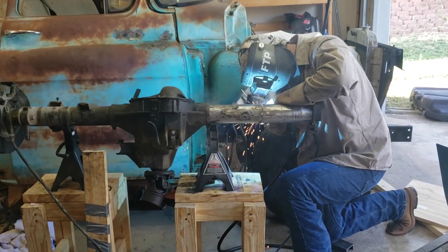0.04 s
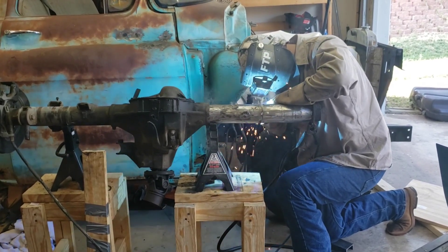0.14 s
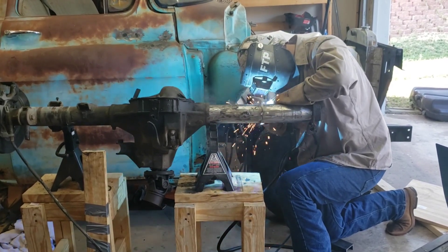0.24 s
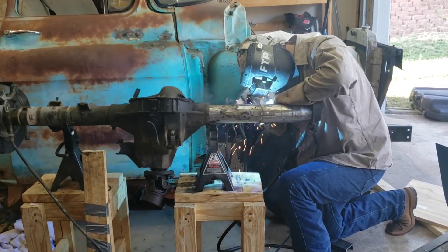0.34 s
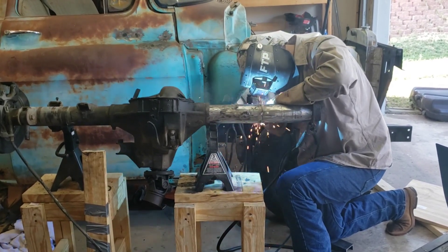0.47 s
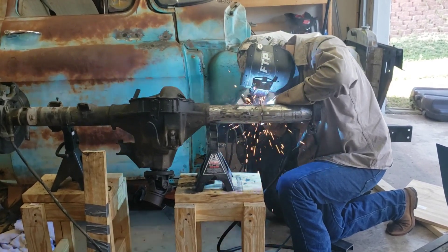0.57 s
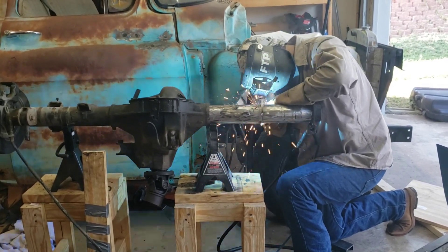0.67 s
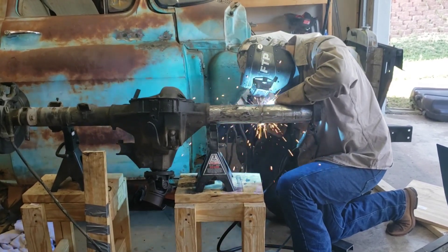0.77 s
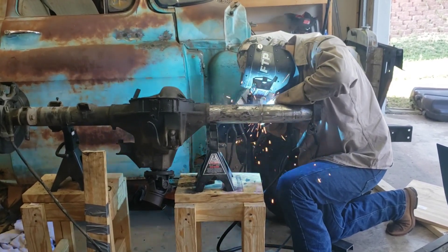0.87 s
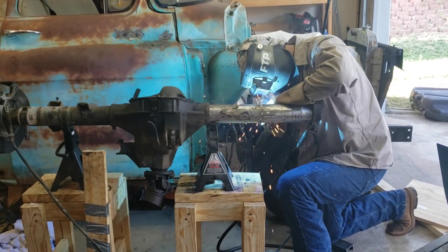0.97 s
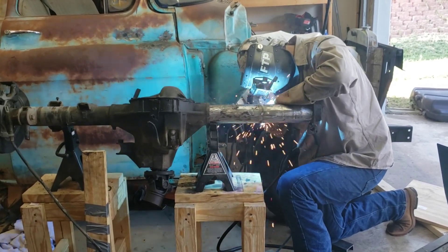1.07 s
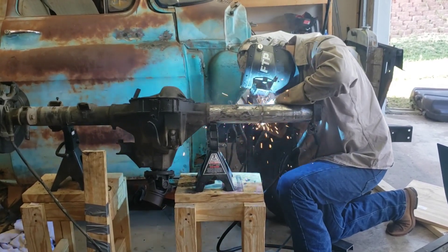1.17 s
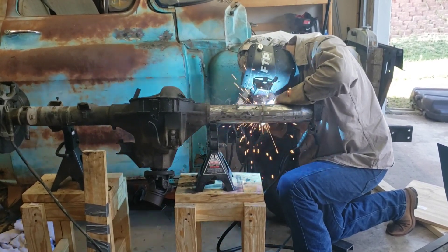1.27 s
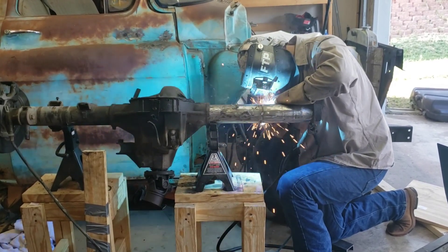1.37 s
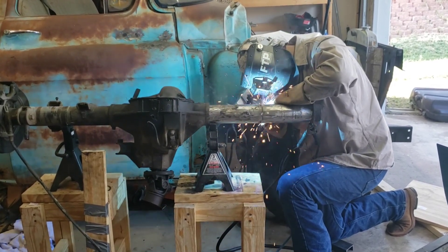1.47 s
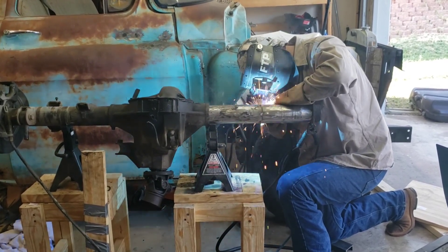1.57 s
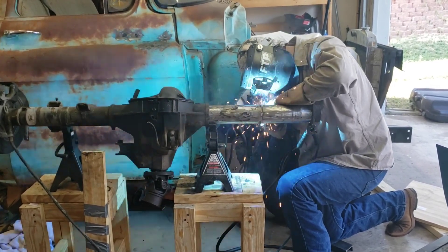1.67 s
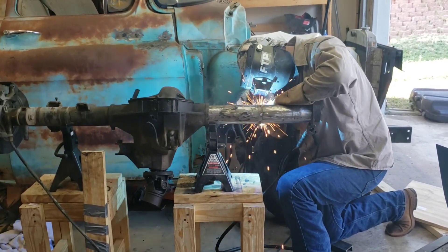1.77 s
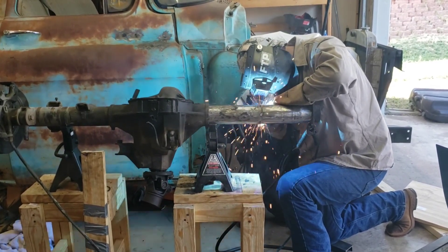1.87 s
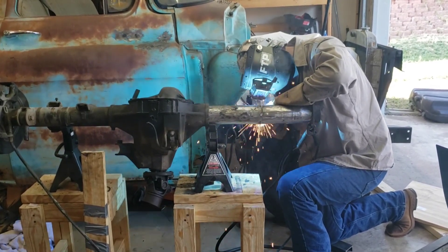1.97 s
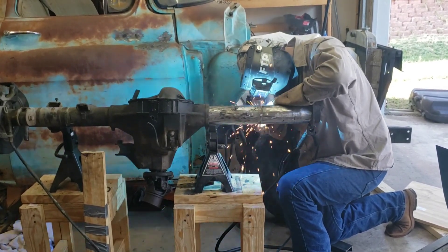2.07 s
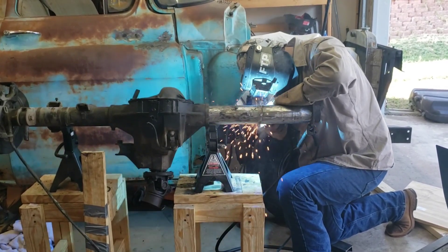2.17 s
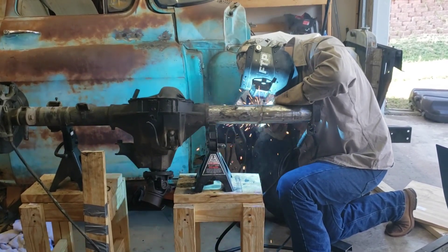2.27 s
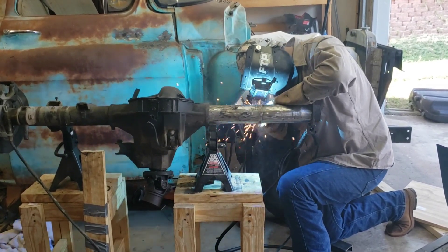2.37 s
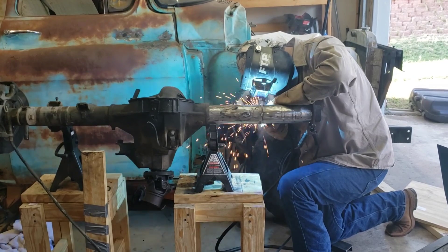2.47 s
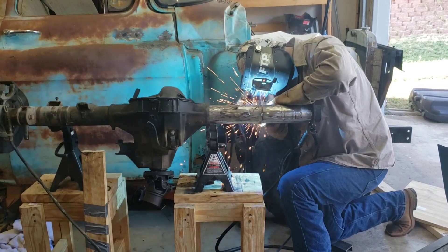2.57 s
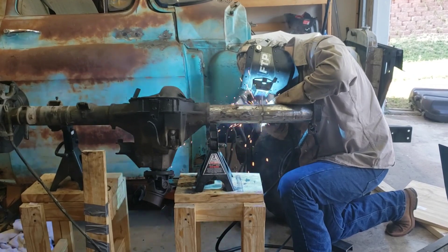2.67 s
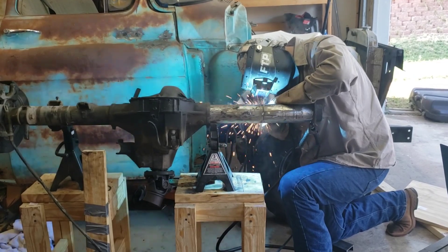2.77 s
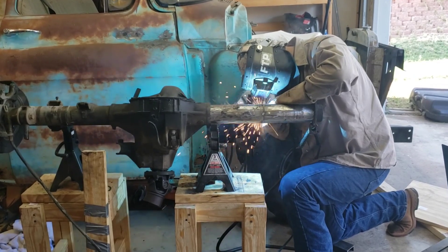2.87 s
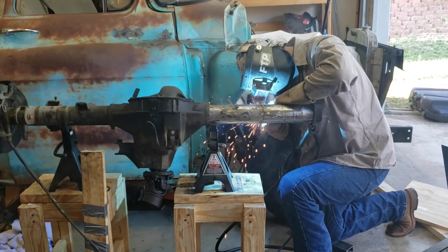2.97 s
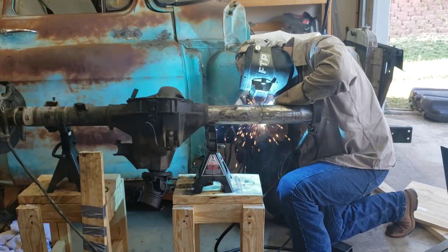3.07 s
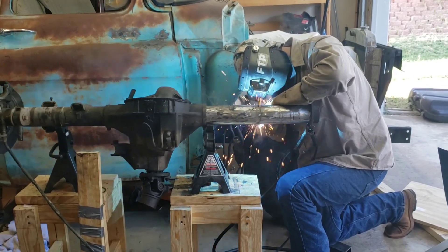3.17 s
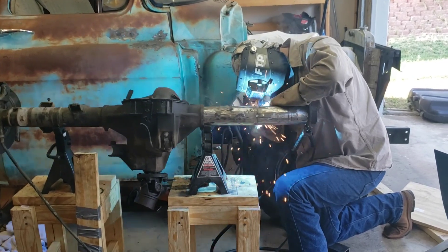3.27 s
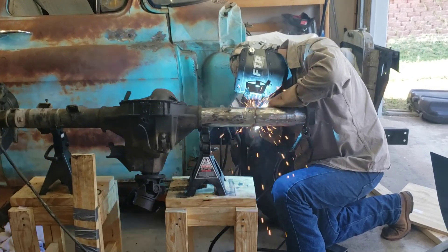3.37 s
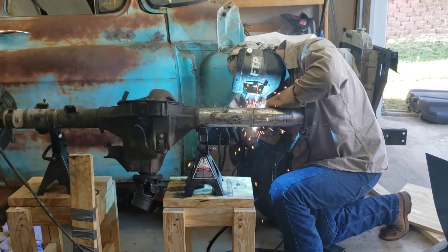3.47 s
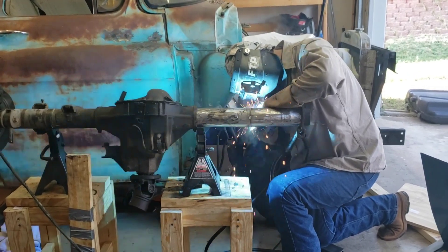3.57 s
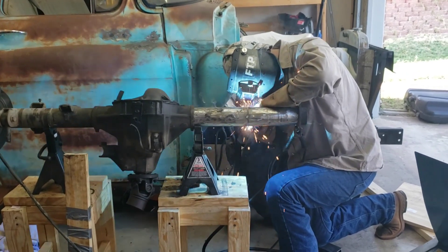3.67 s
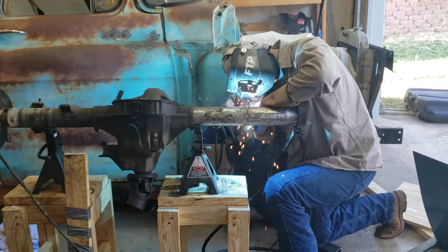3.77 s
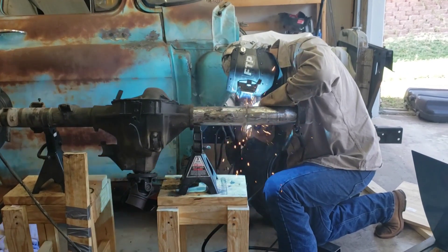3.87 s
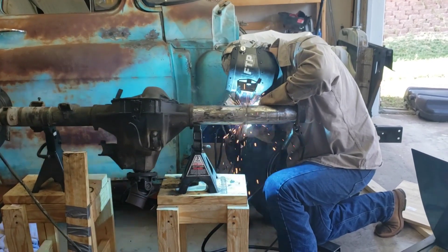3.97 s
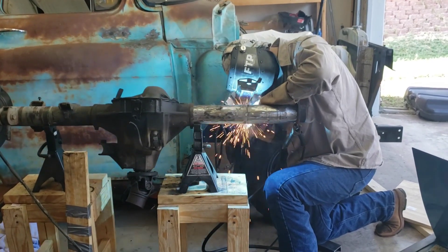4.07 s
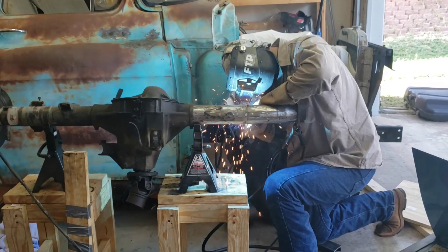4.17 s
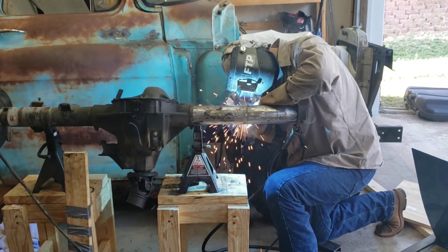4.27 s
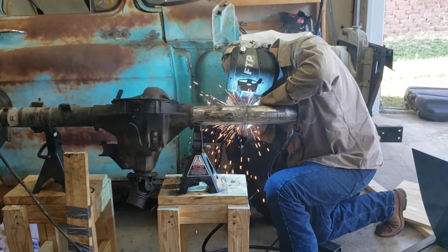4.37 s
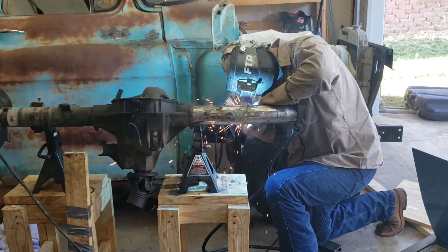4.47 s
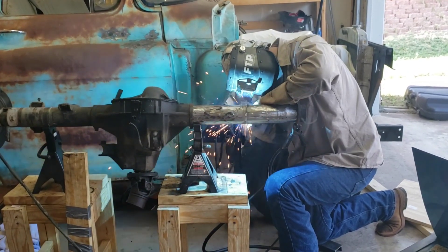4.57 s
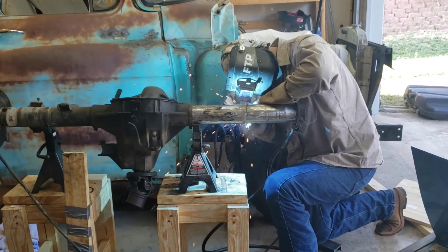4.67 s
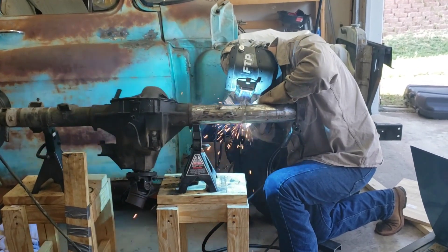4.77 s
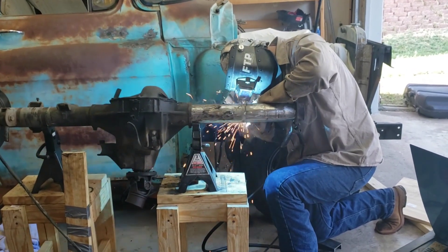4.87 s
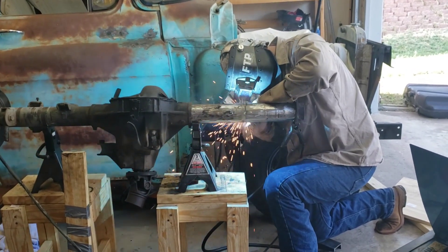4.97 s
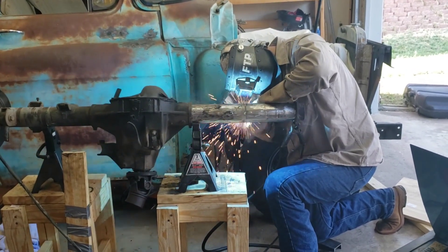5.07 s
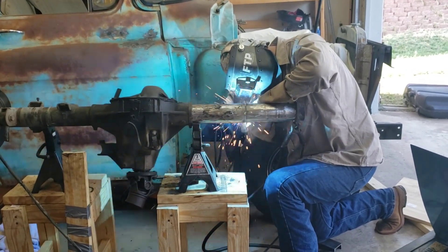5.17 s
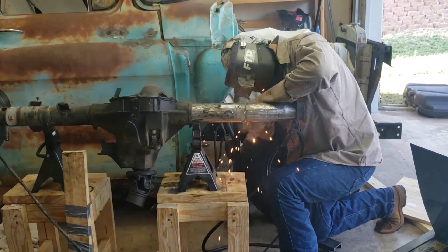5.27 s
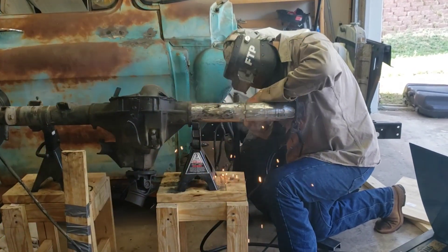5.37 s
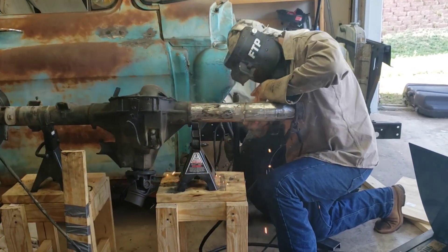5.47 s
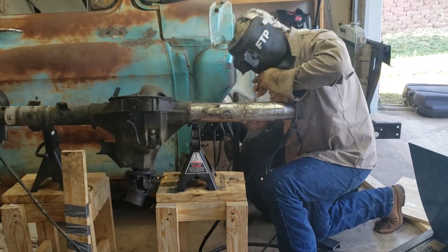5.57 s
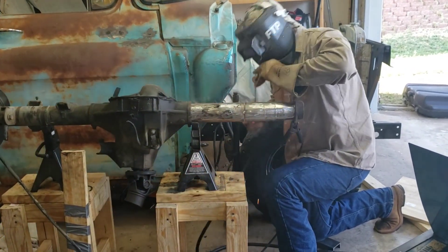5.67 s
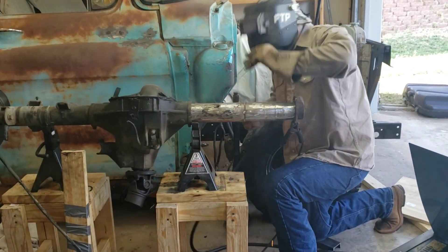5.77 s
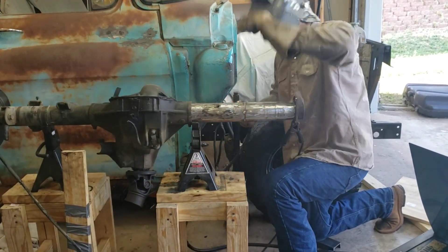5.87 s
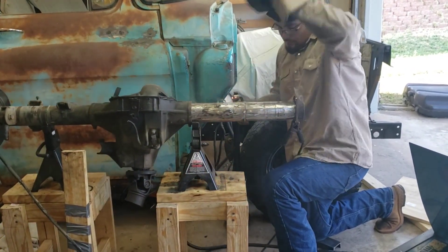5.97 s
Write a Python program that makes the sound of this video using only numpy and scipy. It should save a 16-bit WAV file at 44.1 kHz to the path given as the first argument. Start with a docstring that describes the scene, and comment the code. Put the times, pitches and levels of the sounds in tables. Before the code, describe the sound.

Close by in a small workshop, an electric welding arc is already crackling on steel, a fast, buzzing, frying sound with a slight metallic ring. It falters and pops now and then, growing slightly stronger and busier in the second half. The sizzle cuts off abruptly after roughly five seconds, uncovering the quiet whir of the welder's cooling fan and a faint brush of heavy cloth.

```python
"""A workshop: short-circuit wire welding on a steel axle tube, heard by a phone two metres away.
About ninety times a second the wire spits into the pool, then pinches off with a crack;
tube and room ring and smear the cracks into a sizzle. The arc stops at once, leaving
the machine's fan and hum and a rustle of the jacket as the helmet is lifted."""
import sys
import numpy as np
from scipy import signal
from scipy.fft import rfft, irfft, next_fast_len
from scipy.io import wavfile
from scipy.ndimage import uniform_filter1d

SR = 44100
rng = np.random.default_rng(int(sys.argv[2]) if len(sys.argv) > 2 else 0)


def int16_out(signal):
    """Quantize to a 16-bit WAV file."""
    q = np.round(np.clip(np.atleast_2d(signal).T, -1, 1) * 32767)
    wavfile.write(sys.argv[1], SR, q.astype(np.int16))


N = 265769
TIME = np.arange(N) / SR
ARC_STOP_S = 5.241


def undb(db):
    """Decibels to gain."""
    return 10 ** (np.asarray(db) / 20)


def unit(x):
    """Scale to rms 1."""
    return x / np.sqrt(np.mean(x ** 2))


def curve(table):
    """Linear envelope through (time_s, value) rows."""
    return np.interp(TIME, *np.array(table, float).T)


def walk(rate_hz):
    """Smooth random drift, rms 1."""
    return unit(np.interp(TIME * rate_hz, np.arange(N), rng.standard_normal(N)))


def clicks(times_s, sizes):
    """One impulse at each time."""
    return np.bincount(np.clip(times_s * SR, 0, N - 1).astype(int), sizes, N)


def colour(x, outline, peaks=()):
    """Minimum-phase filter: (freq_hz, gain_db) outline plus (freq_hz, width_hz, gain_db) peaks."""
    size = 2 * next_fast_len(x.shape[-1] // 2 + 4096)
    hz = np.maximum(np.fft.rfftfreq(size, 1 / SR), 1)
    outline_hz, outline_db = np.array(outline, float).T
    db = np.interp(np.log(hz), np.log(outline_hz), outline_db)
    for centre_hz, width_hz, gain_db in peaks:
        db = db + gain_db / (1 + (2 * (hz - centre_hz) / width_hz) ** 2)
    cepstrum = irfft(np.log(undb(db)))
    cepstrum[1:size // 2] *= 2
    cepstrum[size // 2 + 1:] = 0
    return irfft(rfft(x, size) * np.exp(rfft(cepstrum)))[..., :x.shape[-1]]


def flatten(response, width_hz=50):
    """Level a response's broad humps and hollows, keeping its fine pattern."""
    spectrum = rfft(response, SR)
    power = uniform_filter1d(abs(spectrum) ** 2, size=width_hz)
    return irfft(spectrum / np.sqrt(power), SR)[:, :response.shape[1]]


def diffuse(size, apart_hz):
    """Noise from all sides: bass alike at both microphone ports, treble unrelated."""
    mid, side = rfft(rng.standard_normal((2, size)))
    coherence = 1 / (1 + (np.fft.rfftfreq(size, 1 / SR) / apart_hz) ** 2)
    mid, side = mid * np.sqrt(1 + coherence), side * np.sqrt(1 - coherence)
    return irfft(np.array([mid + side, mid - side]), size) / np.sqrt(2)


# Cooling air spectrum: freq_hz, gain_db
FAN_SPECTRUM = [(30, -35), (60, -24), (90, -13.5), (160, -14.5), (215, -7.5), (450, -12), (600, -10),
                (1050, -11), (1700, -22), (3300, -31.5), (4300, -31), (5500, -35.5), (7500, -48),
                (12000, -46), (15500, -42)]
# Motor and blade tones: pitch_hz, level_db
FAN_HUM = [(52, -65), (210, -62), (238, -64), (323, -66), (468, -69), (576, -61), (705, -66), (894, -68)]


def fan(air_db=-48.5, waver_hz=2.27):
    """Air rushes through the machine's case over the wavering tones of motor and blades."""
    air = unit(colour(diffuse(N, apart_hz=884), FAN_SPECTRUM))
    air *= undb(air_db + .7 * walk(rate_hz=9))
    hum = 0
    for pitch_hz, level_db in FAN_HUM:
        phase = 2 * np.pi * np.cumsum(pitch_hz + waver_hz * walk(rate_hz=14)) / SR
        hum += np.sqrt(2) * undb(level_db + 2 * walk(rate_hz=6.5)) * np.sin(phase)
    return air + hum


# Jacket slide: time_s, level_db
JACKET_LEVEL = [(5.7, -90), (5.82, -72), (5.89, -71), (5.93, -66), (6.03, -71)]
# Rubbing cotton spectrum: freq_hz, gain_db
COTTON_SPECTRUM = [(100, -18), (600, 2), (2000, -8.5), (5000, -10), (9000, -13), (15000, -8)]


def jacket(grain_db=3):
    """Heavy cotton rubs in small catches as the arm comes up."""
    rub = unit(colour(diffuse(N, apart_hz=1000), COTTON_SPECTRUM))
    return rub * undb(curve(JACKET_LEVEL) + grain_db * walk(rate_hz=47))


def room_echoes(t, t60_low_s=.285, t60_high_s=.24, build_s=.004, cluster_db=5.5, cluster_s=.012):
    """A quick echo cluster off helmet, floor and car body leads into the shop's reverberation."""
    noise = diffuse(len(t), apart_hz=790)
    low = signal.sosfiltfilt(signal.butter(1, 5000, fs=SR, output="sos"), noise)
    high = noise - low
    tail = flatten(low * 1000 ** (-t / t60_low_s) + high * 1000 ** (-t / t60_high_s))
    cluster = np.sqrt(1 + (undb(cluster_db) * np.exp(-t / cluster_s)) ** 2)
    onset = 1 - np.exp(-(t / build_s) ** 2)
    return unit(tail * cluster * onset)


# Short-path colour, no treble lost to walls: freq_hz, gain_db
NEAR_SPECTRUM = [(300, -12), (1500, -6), (5000, -3.3), (8000, -2.5), (11000, 0), (15000, .5)]


def near_paths(t, direct_db=-3, glint_s=.00055, left_db=-.3, right_db=-6.3):
    """Direct ray plus glints off tube and helmet; the left port faces the work."""
    near = unit(rng.standard_normal((2, len(t))) * np.exp(-t / glint_s)) / np.sqrt(len(t))
    near[0, 0] = near[1, 1] = undb(direct_db)  # one sample later on the right
    delayed = np.pad(near, ((0, 0), (32, 0)))[:, :len(t)]
    return undb([[left_db], [right_db]]) * colour(unit(flatten(delayed)), NEAR_SPECTRUM)


# Spectrum of one crack: freq_hz, gain_db
CRACK_SPECTRUM = [(60, -24), (165, -26), (240, -5.5), (480, -9.5), (1200, -6), (2900, -4.5), (4800, -5.5),
                  (6500, -4), (8000, -8), (10000, -1.6), (12000, 0.76), (14500, 1), (15600, 4)]
# Hollows between tube, helmet and car body: freq_hz, width_hz, seam_start_db, seam_end_db
CAVITY_MODES = [(260, 100, 3.5, 4), (480, 90, -1, -1), (900, 90, 9, 4), (1000, 170, 5.5, .5),
                (1490, 110, 8, 2), (1630, 170, 1.5, 5), (1920, 110, 3.5, -1), (2260, 260, 3, 5.5),
                (2420, 70, -2, -4), (2580, 110, 5, 1), (2740, 70, -4, -2), (2900, 300, -2, -3),
                (3290, 170, 0, 1), (3650, 120, -3, -1), (4100, 400, .3, 2), (4900, 1100, 1, 2.5),
                (6200, 900, -.5, -1.5)]
# Narrow treble rings and dips of the tube and the room: freq_hz, width_hz, seam_start_db, seam_end_db
TREBLE_RESONANCES = [(3790, 80, 6.5, 1), (4318, 40, 3, 1), (4390, 60, -3, -4), (4457, 50, 2, 4),
                     (4525, 60, 2.3, 2), (4740, 100, -3.5, -2), (4860, 60, 1, 2.5), (4920, 60, 3.5, 2),
                     (4990, 35, -3, -3), (5035, 55, 2, 2.5), (5167, 50, 5, 1.5), (5305, 50, -3, -1),
                     (5447, 70, 1.5, 4), (10230, 130, 0, 3), (11190, 80, 3, 2), (11897, 100, 4, 1),
                     (12500, 70, 4.5, 0), (12688, 60, 2.5, 3), (13138, 60, 2, 4), (13370, 70, 2.5, 3.5),
                     (13600, 60, 4.5, 1), (13730, 45, 5, 3), (14793, 80, 3.5, 0), (15225, 70, 0, 5),
                     (15564, 45, 5, 0), (15634, 55, 6.5, 1)]


def workshop(source, positions=8):
    """The torch creeps along the seam; each pattern of resonances and echoes fades into the next."""
    t = TIME[:SR // 2]
    lead = SR // 3  # arc already burning: room full from the start
    source = np.pad(source, (lead, 0), mode="reflect")
    torch = np.pad(np.minimum(TIME / ARC_STOP_S, 1) * (positions - 1), (lead, 0))
    out = np.zeros((2, N))
    for k, along in enumerate(np.linspace(0, 1, positions)):
        peaks = [(hz, width_hz, start_db + along * (end_db - start_db))
                 for hz, width_hz, start_db, end_db in CAVITY_MODES + TREBLE_RESONANCES]
        share = np.clip(1 - abs(torch - k), 0, 1) ** .6
        paths = (room_echoes(t) + near_paths(t)) / np.sqrt(len(t))
        response = colour(paths, CRACK_SPECTRUM, peaks)
        out += signal.oaconvolve((source * share)[None], response, axes=1)[:, lead:lead + N]
    return out


def spatter(rate_hz=500, spread_db=4):
    """Flying droplets burst in tiny ticks."""
    droplets = rng.random(N) < rate_hz / SR
    return unit(droplets * undb(spread_db * np.minimum(rng.exponential(size=N), 4)))


# Wire stubs: relight_s, falter_s, flare_s, flare_db, body_db
WIRE_STUBS = [(.32, .01, .015, 3, -1), (.524, .015, .026, 1.5, 0), (.607, .014, .035, 3, 3),
              (.657, .012, .03, 1.5, 0), (1.03, .03, .04, 1, 0), (1.822, .008, .022, 2.5, -2.5),
              (2.595, .005, .022, 1.5, 0), (2.74, .01, .023, .5, 0), (2.912, .015, .02, 1.5, 1),
              (3.04, .02, .01, 1, 0), (3.179, .01, .02, 1.5, 0), (3.76, .012, .025, 3.5, -.5),
              (3.839, .008, .09, 1.2, 1), (4.0, .025, .05, 1, 0), (4.399, .025, .028, 1.6, 0),
              (4.427, 0, .06, 3.4, 0), (4.579, .012, .012, 2, -1), (4.607, .008, .03, 2.5, -1),
              (4.741, .022, .04, 1.3, 0), (4.839, .012, .042, 2.3, 0), (5.201, .008, .04, 1.3, 1)]


def sputters(falter_db=-6):
    """The wire stubs; the arc falters, then relights with a flare. Level and body curves in dB."""
    dip, flare, body = np.zeros((3, N))
    for relight_s, falter_s, flare_s, flare_db, body_db in WIRE_STUBS:
        stub = int((relight_s - falter_s) * SR)
        relight = int(relight_s * SR)
        settle = int((relight_s + flare_s) * SR)
        dip[stub:relight] = falter_db
        flare[relight:settle] = flare_db
        body[relight:settle] = body_db
    return dip + flare, body


# Big drops pinching off: time_s, above_usual_db
DROP_POPS = [(.565, 5), (.611, 4), (.674, 3), (1.499, 4), (1.758, 3), (1.827, 2), (1.871, 5), (2.324, 2.5),
             (2.915, 1), (2.992, 3), (3.099, 3), (3.182, 2), (3.764, 3), (3.843, 2.5), (3.961, 3),
             (4.043, 4), (4.296, 3), (4.404, 1), (4.491, 2), (4.525, 3), (4.583, 2), (4.623, 3),
             (4.7478, 4.5), (4.773, 3), (4.8446, 4), (4.866, 3), (4.875, 3), (4.978, 3), (5.207, 5),
             (5.232, 4.5), (5.2392, 5)]


def pinch_offs(rate_hz=94, gap_spread=.16, scatter_db=2.4):
    """Times and sizes of the cracks: an uneven rhythm that makes way for the loud pops."""
    gap_draw, size_draw = rng.standard_normal((700, 2)).T
    times_s = np.cumsum(np.exp(gap_spread * gap_draw) / rate_hz)
    pop_s, pop_db = np.array(DROP_POPS).T
    to_pop_s = abs(times_s[:, None] - pop_s).min(axis=1)
    usual = (times_s < ARC_STOP_S) & (to_pop_s > .6 / rate_hz)
    usual_db = scatter_db * np.tanh(size_draw[usual])
    return np.append(times_s[usual], pop_s), undb(np.append(usual_db, pop_db))


# Arc strength as the hand guides the torch: time_s, gain_db
ARC_DRIFT = [(0, -23), (.42, -24.5), (.85, -24.1), (1.0, -24.9), (1.25, -24.3), (1.55, -24.8), (1.9, -22.8),
             (2.25, -24.3), (2.55, -22.8), (3.25, -22.8), (3.58, -24.7), (3.72, -25.2), (3.9, -22.5),
             (4.25, -21.8), (4.55, -22.8), (4.7, -24), (4.8, -23.2), (5.2, -21.7)]
# Body against sizzle as the torch works round the tube: time_s, gain_db
ARC_BODY = [(0, -3.5), (1, -0.5), (2, -1), (3, -1.7), (3.7, -0.4), (4.4, 0.14), (5.15, -0.5), (5.24, -2.5)]


def arc(short_s=.0026, spit_s=.0009, spit_db=-1, spit_scatter_db=1.5, hiss_db=-18, spatter_db=-16):
    """The wire touches the pool with a spit, shorts the arc briefly, and relights it with a crack."""
    crack_s, sizes = pinch_offs()
    cracks = unit(clicks(crack_s, sizes))
    length_draw, size_draw = rng.standard_normal((len(crack_s), 2)).T
    touch_s = crack_s - short_s * np.exp(.07 * length_draw)
    touches = clicks(touch_s, sizes * undb(spit_scatter_db * size_draw))
    bursts = np.convolve(touches, np.hanning(int(spit_s * SR)), "same")
    spits = unit(bursts * rng.standard_normal(N))
    # plasma hisses only while the wire is clear of the pool
    ones = np.ones(len(crack_s))
    shorted = np.cumsum(clicks(touch_s, ones) - clicks(crack_s, ones)) > 0
    hiss = ~shorted * rng.standard_normal(N)
    sound = cracks + undb(spit_db) * spits + undb(hiss_db) * hiss + undb(spatter_db) * spatter()
    # steady wire feed: a big drop means smaller neighbours
    burning = sound[TIME < ARC_STOP_S]
    power = uniform_filter1d(uniform_filter1d(burning ** 2, size=3200), size=3200)
    steady = np.pad(burning / np.sqrt(power), (0, N - len(burning)))
    sputter_db, flare_body_db = sputters()
    sound = steady * undb(curve(ARC_DRIFT) + sputter_db)
    body = signal.sosfiltfilt(signal.butter(2, 7500, fs=SR, output="sos"), sound)
    return sound + body * (undb(curve(ARC_BODY) + flare_body_db) - 1)


def scene(arc_gain_db=-1.5):
    """The arc in its room, over fan and jacket."""
    return undb(arc_gain_db) * workshop(arc()) + fan() + jacket()


# Left microphone port against the right, peak and deep notch: freq_hz, gain_db
LEFT_PORT_RESPONSE = [(50, -11), (150, -5), (500, -5.5), (900, -6.5), (1600, -7), (2000, -2), (2900, 0),
                      (3500, 3.5), (4900, 9), (6500, 0), (7900, -43), (9400, 1.3), (10300, 0.5),
                      (15500, -1.5)]


def record(dry):
    """The left port colours its channel; the phone cuts the top."""
    ports = np.array([colour(dry[0], LEFT_PORT_RESPONSE), dry[1]])
    return signal.sosfilt(signal.ellip(12, .2, 80, 15730, fs=SR, output="sos"), ports)


dry = scene()
out = record(dry)
int16_out(out)
```